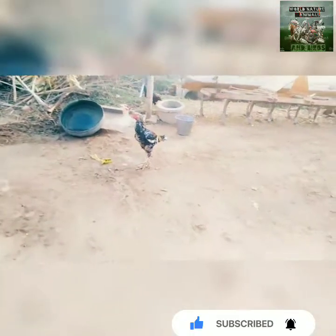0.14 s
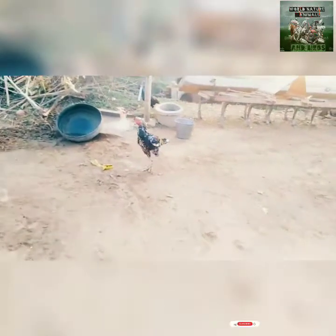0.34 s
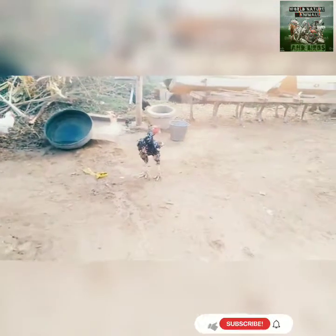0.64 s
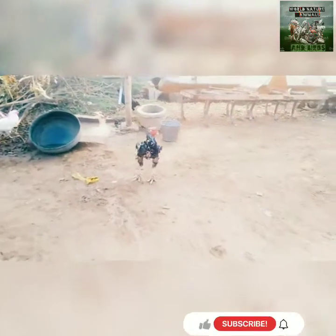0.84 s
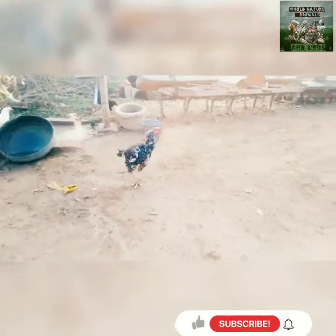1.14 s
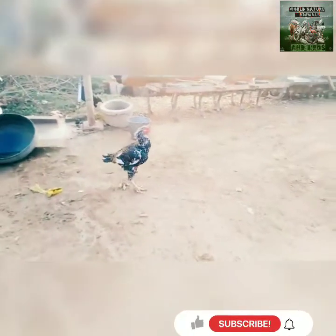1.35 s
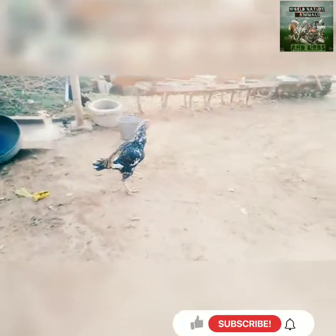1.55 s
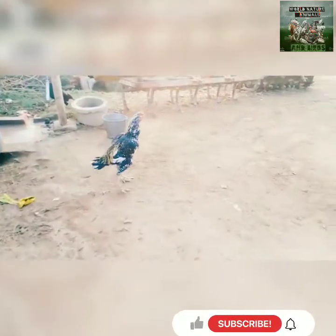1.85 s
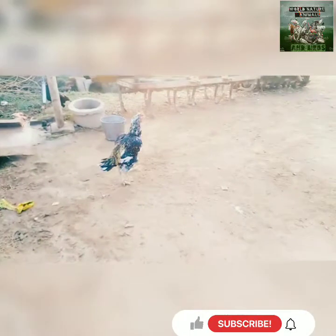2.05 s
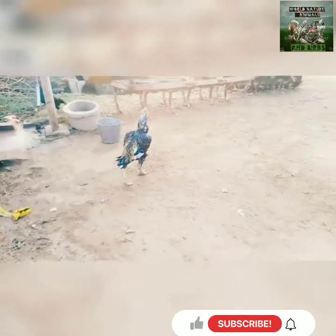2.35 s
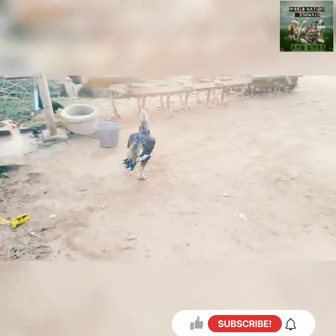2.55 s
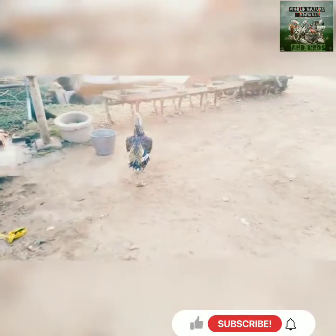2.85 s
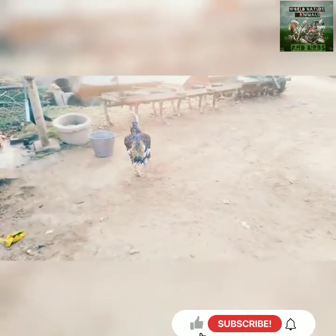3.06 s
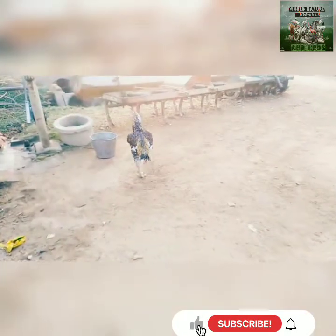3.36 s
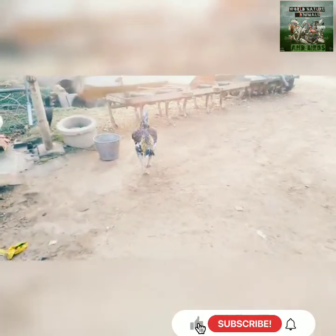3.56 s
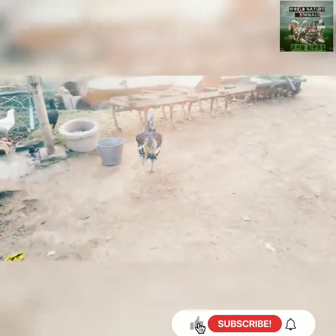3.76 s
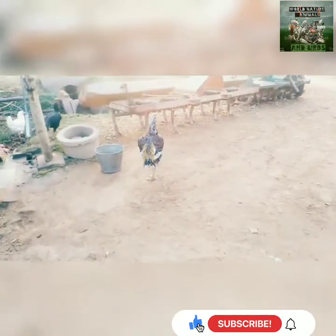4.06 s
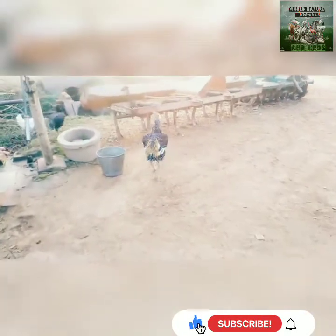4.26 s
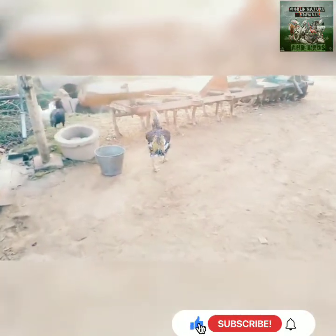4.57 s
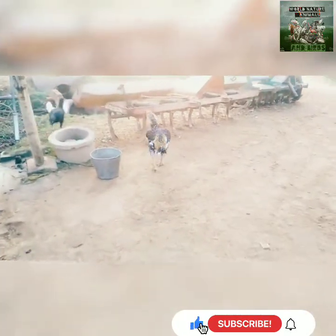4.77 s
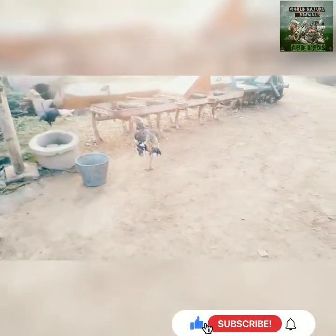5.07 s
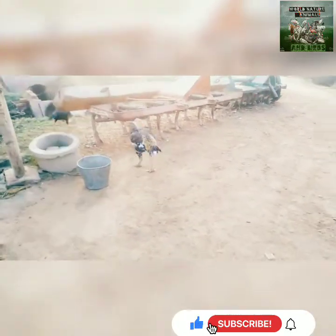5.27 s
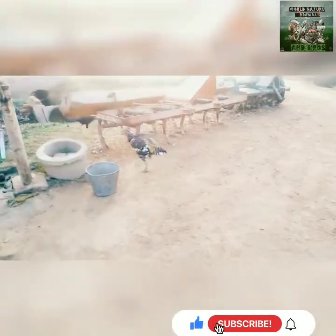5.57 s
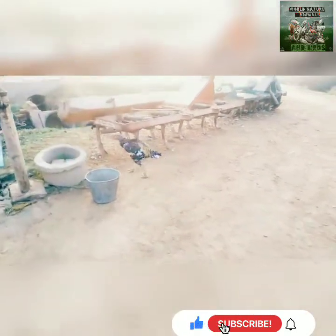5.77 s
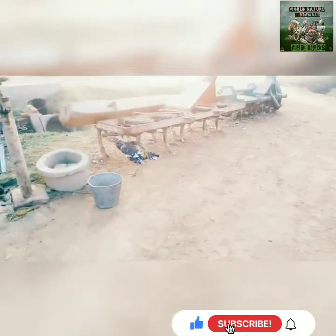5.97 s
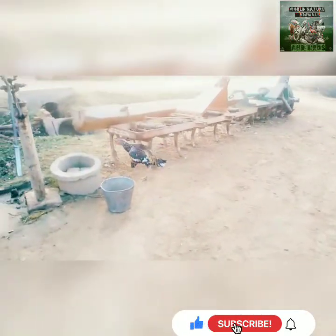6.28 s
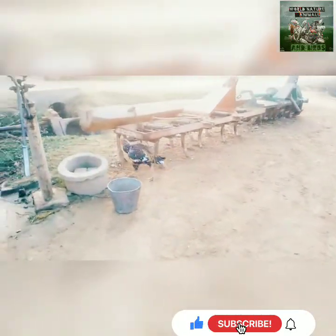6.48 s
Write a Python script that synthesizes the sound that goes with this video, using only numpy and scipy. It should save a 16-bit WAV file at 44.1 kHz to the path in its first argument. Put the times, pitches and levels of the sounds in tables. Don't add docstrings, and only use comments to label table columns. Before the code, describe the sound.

Long clear chicken call breaks into a squawk, followed by sparse clucks, light ticks and grit scuffs, with distant traffic rumbling underneath.

```python
import sys
import numpy as np
from scipy import signal
from scipy.fft import rfft, irfft
from scipy.io import wavfile
from scipy.ndimage import uniform_filter1d

SR = 44100
rng = np.random.default_rng(int(sys.argv[2]) if len(sys.argv) > 2 else 0)


def int16_out(signal):
    q = np.round(np.clip(np.atleast_2d(signal).T, -1, 1) * 32767)
    wavfile.write(sys.argv[1], SR, q.astype(np.int16))


def gain_from_db(level_db):
    decades = np.asarray(level_db, float) / 20
    return 10 ** decades


N = 292383


def rms_one(x):
    return x / np.sqrt(np.mean(x ** 2) + 1e-20)


def at_hz(points, hz):
    table_hz, table_db = np.transpose(points)
    return np.interp(np.log(hz), np.log(table_hz), table_db)


def wobble(size, rate_hz):
    r = np.exp(-2 * np.pi * rate_hz / SR)
    noise = rng.standard_normal(max(N // 8, size + 2000))
    slow = signal.lfilter([1], [1, -2 * r, r * r], noise)
    return rms_one(slow[2000:2000 + size])


def swell(rise_s, hold_s, fall_s):
    t = np.arange(int((rise_s + hold_s + 2 * fall_s) * SR)) / SR
    rising = np.sin(np.pi / 2 * np.clip(t / rise_s, 0, 1)) ** 2
    return rising * gain_from_db(-20 * np.clip(t - rise_s - hold_s, 0, None) / fall_s)


def add(track, s, sound):
    i = int(s * SR)
    track[i:i + len(sound)] += sound[:N - i]


def coloured(spectrum):
    hz = np.maximum(np.arange(N // 2 + 1) * SR / N, 1)
    return rms_one(irfft(rfft(rng.standard_normal(N)) * gain_from_db(at_hz(spectrum, hz)), N))


def band(x, low_hz, high_hz, order=3):
    edges_hz = [low_hz, min(high_hz, .45 * SR)]
    return signal.sosfilt(signal.butter(order, edges_hz, "band", fs=SR, output="sos"), x)


# (frequency [Hz], density [dB])
HISS = [(240, -25), (400, 0.5), (948, -7.5), (1550, -11.5), (1850, -11), (12400, -17), (14000, -18.5)]


def hiss():
    return gain_from_db(-89.5) * coloured(HISS)


# (frequency [Hz], density [dB])
RUMBLE = [(25, -34.5), (40, -20), (50, -9), (101, -1), (205, -6.5), (255, -16.5), (310, -30.5),
          (620, -77.5)]
RUMBLE_DB, GUST_DB = -60, 2
DRONE_HZ, DRONE_DB = 97.5, -71
LEAK_DB, LEAK_FROM_DB, LEAK_SPAN_DB = -62.5, -69.5, 21


def traffic(birds):
    coarse = wobble(N // 16 + 2, 16 * 19.0)
    gust = np.interp(np.arange(N) / 16, np.arange(len(coarse)), coarse)
    drone = rms_one(band(rng.standard_normal(N), DRONE_HZ - 6, DRONE_HZ + 6, order=2))
    heard_db = 10 * np.log10(uniform_filter1d(birds ** 2, size=2600) + 1e-12)
    opened = np.clip((heard_db - LEAK_FROM_DB) / LEAK_SPAN_DB, 0, 1)
    skirt = gain_from_db(LEAK_DB) * opened * rms_one(band(rng.standard_normal(N), 200, 270, order=2))
    rumble = gain_from_db(RUMBLE_DB) * coloured(RUMBLE)
    return gain_from_db(GUST_DB * gust) * (rumble + skirt) + gain_from_db(DRONE_DB) * drone


# (time [s], length [s], pitch [Hz], level [dB])
WHISTLES = [(0, 0.15, 558, -58), (0, 0.17, 1962, -69.5), (0, 0.098, 3100, -74.5), (0.061, 0.045, 1417, -73),
            (0.157, 0.04, 1302, -68), (0.377, 0.03, 1750, -75.5), (0.378, 0.16, 879, -72.5),
            (0.435, 0.13, 1496, -81.5), (0.659, 0.13, 1413, -86), (0.683, 0.093, 929, -82),
            (0.823, 0.06, 1880, -74), (0.971, 0.021, 3260, -66), (0.986, 0.18, 1520, -69),
            (1.417, 0.029, 1056, -79), (1.876, 0.046, 2620, -72), (1.922, 0.033, 1635, -77),
            (3.085, 0.016, 2750, -66), (4.607, 0.16, 2180, -73), (4.981, 0.18, 1370, -87),
            (5.8, .12, 530, -66), (4.18, .05, 650, -66), (6.35, .06, 540, -58), (6.35, .06, 1550, -70),
            (4.648, .025, 2190, -62), (4.35, .08, 970, -70), (6.1, .06, 600, -56), (4.385, .035, 1830, -78),
            (5.448, 0.073, 1306, -75), (6.141, 0.17, 1566, -68.5)]
# (time [s], length [s], first pitch
# [Hz], last pitch [Hz], level [dB])
CHIRPS = [(0.08, 0.027, 3520, 3340, -60), (0.093, 0.02, 6260, 6020, -69.5),
          (0.182, 0.12, 2690, 2630, -83.5), (1.522, 0.08, 2860, 3280, -75), (1.8, 0.43, 1066, 1220, -73),
          (2.09, 0.18, 1469, 1467, -80.5), (2.32, 0.049, 2850, 2770, -69),
          (2.345, 0.056, 2934, 2840, -57.5), (2.35, 0.067, 2680, 2600, -68.5), (2.36, .06, 2090, 2100, -76),
          (2.53, 0.043, 5740, 5680, -77.5), (2.58, .04, 5570, 5270, -81), (2.632, 0.049, 4970, 5040, -75),
          (2.705, 0.043, 5300, 5240, -76), (2.765, 0.035, 6100, 6200, -73),
          (3.48, 0.091, 2365, 2280, -78.5), (3.52, 0.2, 2184, 1987, -77), (3.492, 0.14, 477.5, 563, -66),
          (3.62, .06, 2330, 2310, -77), (3.71, 0.13, 2000, 2040, -85), (1.522, .025, 1350, 1450, -62),
          (1.6, .04, 2200, 2150, -76), (1.6, .13, 3250, 3300, -78), (4.845, 0.32, 1015, 830, -80),
          (5.62, 0.093, 3900, 3800, -87), (5.62, 0.098, 5370, 5500, -91), (5.86, .05, 1100, 1120, -70),
          (6.425, 0.029, 2740, 2650, -82)]
# (time [s], length [s], first pitch [Hz], last pitch
# [Hz], level [dB])
RASPS = [(0, 0.36, 289, 264.4, -61.5), (.014, 0.35, 428, 373, -71), (.07, 0.18, 3150, 3200, -77.5),
         (1.595, 0.096, 4310, 4260, -61.5), (1.61, 0.084, 2810, 2706, -73.5), (2.0, 0.053, 2790, 2760, -77),
         (2.034, 0.019, 461, 414, -52.5), (3.5, 0.28, 2300, 1900, -74), (5.8, 0.26, 320, 310, -70.5),
         (2.543, 0.033, 9020, 9040, -59.5), (6.055, .16, 5700, 4840, -67), (2.33, .09, 1800, 1900, -76),
         (5.815, .06, 1540, 1560, -70), (5.865, .12, 1620, 1600, -66), (5.57, .05, 1500, 1600, -70),
         (5.92, .08, 2200, 2150, -72), (6.1, .1, 2200, 2150, -72), (6.09, .08, 3200, 3300, -76),
         (6.523, 0.032, 3940, 3920, -81)]
# (time [s], length [s], pitch [Hz], level [dB], blur [Hz])
HELD = [
    (4.99, .56, 1760, -76.5, 24),
]
WHISTLE_SAG, CHIRP_BLUR, RASP_BLUR = 0.0084, 0.012, 0.073
WAVERS_PER_NOTE = 4


def blurred_tone(pitch_hz, shape, blur_hz, steady, spread):
    phase = 2 * np.pi * np.cumsum(pitch_hz) / SR
    paths = wobble(len(shape), blur_hz) + 1j * wobble(len(shape), blur_hz)
    return shape * np.real((steady + spread * paths) * np.exp(1j * phase))


def whistles():
    out = np.zeros(N)
    notes = []
    for s, length_s, hz, level_db in WHISTLES:
        notes.append((s, length_s, hz, hz * (1 - WHISTLE_SAG), level_db, WAVERS_PER_NOTE / length_s))
    for rows, blur in [(CHIRPS, CHIRP_BLUR), (RASPS, RASP_BLUR)]:
        notes += [(*row, blur * row[2]) for row in rows]
    for s, length_s, first_hz, last_hz, level_db, blur_hz in notes:
        shape = swell(0.11 * length_s, 0.39 * length_s, 0.57 * length_s)
        pitch_hz = np.linspace(first_hz, last_hz, len(shape))
        add(out, s, gain_from_db(level_db) * blurred_tone(pitch_hz, shape, blur_hz, 0.16, .5))
    for s, length_s, hz, level_db, blur_hz in HELD:
        shape = swell(.12, length_s, .06)
        pitch_hz = np.full(len(shape), float(hz))
        add(out, s, gain_from_db(level_db) * blurred_tone(pitch_hz, shape, blur_hz, .6, .45))
    return out


# (time [s], length [s], low edge [Hz], high edge [Hz], level [dB])
TICKS = [(.955, 0.0056, 640, 1930, -72.5), (1.252, 0.011, 320, 1000, -46), (1.253, 0.023, 1900, 13940, -62),
         (2.277, 0.034, 3200, 10100, -76), (3.447, 0.01, 3200, 9000, -79),
         (4.244, 0.029, 6980, 13500, -89.5), (4.648, 0.02, 2840, 5000, -62.5),
         (4.962, .012, 1550, 6900, -68), (5.222, 0.041, 3750, 6050, -76), (5.324, 0.016, 400, 3000, -54.5),
         (5.785, 0.0039, 2500, 14100, -70), (5.784, 0.012, 350, 700, -60), (5.785, .01, 750, 1250, -67),
         (6.07, 0.038, 4400, 14300, -65.5), (6.203, 0.03, 5400, 7840, -64.5)]
# (time [s], length [s], low edge [Hz], high edge [Hz], level [dB])
KICKS = [(3.308, 0.14, 4200, 7800, -64.5), (3.37, .13, 3900, 8400, -79), (3.31, 0.15, 10400, 13580, -75),
         (3.72, 0.15, 4850, 6100, -84.5), (3.769, 0.092, 3780, 12700, -85.5),
         (4.8, 0.12, 7400, 12600, -81.5), (5.87, 0.13, 2860, 7200, -68), (5.91, 0.049, 1910, 2500, -75)]
# (time [s], length [s], low edge [Hz], high edge [Hz], level [dB])
SCUFFS = [(.12, 0.31, 4300, 11000, -89.5), (1.08, 0.17, 4170, 13200, -83.5), (2.0, 0.45, 4930, 11890, -88),
          (3.05, 0.2, 5050, 8900, -89.5), (3.999, 0.15, 3340, 11800, -89.5),
          (4.945, 0.081, 2100, 7000, -69), (5.748, 0.16, 3170, 9100, -73), (5.84, 0.29, 495, 3400, -77),
          (6.52, 0.17, 3050, 9850, -87.5)]
TICK_RISE, KICK_RISE, SCUFF_RISE = 0.19, 0.12, 0.29
SNAP = 14


def scuffs():
    out = np.zeros(N)
    for rows, rise in [(TICKS, TICK_RISE), (KICKS, KICK_RISE), (SCUFFS, SCUFF_RISE)]:
        for s, length_s, low_hz, high_hz, level_db in rows:
            shape = swell(rise * length_s, 0, (1 - rise) * length_s)
            uneven_db = 3.2 * min(length_s / 0.039, 1) * wobble(len(shape), 66)
            grit = rng.standard_normal(len(shape)) * gain_from_db(uneven_db)
            if length_s < .02:
                grit[int(rise * length_s * SR)] += SNAP
            grit = signal.lfilter([1], [1, -.88], grit)
            add(out, s, gain_from_db(level_db) * shape * rms_one(band(grit, low_hz, high_hz)))
    return out


# (frequency [Hz], level [dB])
BEAK = [(1400, -16), (1650, -14.5), (2150, -3.5), (2500, -1), (2750, -21), (3050, -1), (3450, -25),
        (4200, -50)]
WIDEN_PER_DB = .5
ECHO_PER_DB, MEAN_CLUCK_DB = -0.35, -36
WASH_DB, WASH_TILT = 9, .7


def cluck(length_s, peak_db, first_hz, beak_db, goal_hz, pull, throat_hz, width_hz, rough, rise, hold, echo_db,
          lift=0, early=1, top_hz=1600, beak_scale=1):
    k = np.arange(1, 20)[:, None]
    shape = swell(rise * length_s, hold * length_s, max(1 - rise - hold, .05) * length_s)
    size = len(shape)
    slide = 1 - np.clip(1 - np.arange(size) / SR / length_s, 0, 1) ** early
    pitch = (first_hz + pull * (goal_hz - first_hz) * slide) * (1 + 0.075 * rough * wobble(size, 56))
    hz = k * pitch

    half_width_hz = width_hz * gain_from_db(WIDEN_PER_DB * (beak_db + 36.5)) / 2
    throat = 1 / (1 + ((hz - throat_hz * (1 + lift * slide)) / half_width_hz) ** 2)
    throat *= np.clip((top_hz - hz) / 300, 0, 1) * np.clip(hz / 480, 0, 1) ** 3.5
    beak = gain_from_db(beak_db + at_hz(BEAK, hz * beak_scale)) * (hz > 1000)

    own = rng.integers(0, N // 20, (2, *k.shape)) + np.arange(size)
    flutter = wobble(N // 10, 30 + 90 * rough)[own[0]]
    scatter = wobble(N // 10, 160)[own[1]]
    lines = np.sin(k * 2 * np.pi * np.cumsum(pitch) / SR + np.pi / 3 * k ** 2)
    throat_gain = throat * (1 + 1.8 * rough * flutter)
    beak_gain = beak * shape ** 0.26 * (0.73 + .6 * scatter)
    wave = np.sum((throat_gain + beak_gain) * lines, axis=0)
    scale = gain_from_db(peak_db) * shape / 2 / np.std(wave)

    sideways = np.sum((throat ** 1.3 + 1.3 * beak) * (0.25 + scatter) * lines, axis=0)
    wash = rms_one(signal.lfilter([1], [1, -WASH_TILT], rng.standard_normal(N // 8)))[:size]
    sideways = sideways + gain_from_db(WASH_DB + min(beak_db, -15)) * np.std(wave) * wash
    send_db = echo_db + ECHO_PER_DB * (peak_db - MEAN_CLUCK_DB)
    return scale * wave, gain_from_db(send_db) * scale * sideways


# (time [s], length [s], peak [dB],
# pitch [Hz], beak opening [dB])
NEAR_HEN = [(1.490, 0.031, -38.5, 245.2, -25), (2.508, 0.036, -42, 292, -36),
            (2.519, 0.051, -26.5, 362.2, -27), (2.741, 0.022, -47, 252, -45),
            (2.759, .036, -27.5, 321, -26.5)]
SHRILL_HEN = [(5.912, 0.014, -42, 225, -15), (6.238, .03, -47, 220, -26), (6.200, 0.031, -24.5, 212, -17)]
FAR_HEN = [(3.264, 0.048, -59.5, 267.3, -29), (3.958, 0.052, -58.5, 329, -30),
           (6.338, 0.062, -56, 259.8, -22), (6.516, 0.024, -65, 307, -61)]
CROONING_HEN = [(3.446, 0.2, -63.5, 436, -26), (3.787, 0.056, -59.5, 408, -38)]
BRIGHT_HEN = [(5.218, 0.021, -32.5, 252, -7.5)]
PIPING_HEN = [(6.06, 0.03, -34.5, 550, -8)]
ROUGH_HEN = [(5.505, .23, -61, 510, -29)]
MUFFLED_HEN = [(4.231, 0.025, -39, 272, -67), (4.644, 0.031, -36, 263.7, -25)]
MUTTERING_HEN = [(5.926, .016, -46, 370, -30), (5.938, .014, -46, 345, -30), (6.047, .02, -56, 480, -5),
                 (6.085, .016, -41, 400, -30)]
LILTING_HEN = [(4.156, .05, -60, 425, -40), (4.286, .05, -54, 465, -46), (4.47, .044, -53, 460, -36)]
HUMMING_HEN = [(4.252, .04, -63, 440, -46), (4.443, .03, -59, 425, -46)]
# goal pitch [Hz], pull towards it [0-1], early [exponent], throat centre and width [Hz],
# throat lift [share], throat top [Hz], beak scale [ratio], rough [0-1], rise and hold [share of length], echo [dB]
HENS = [(NEAR_HEN, dict(goal_hz=206.1, pull=0.65, throat_hz=641, lift=0.11, width_hz=210, rough=0.16, rise=0.1, hold=0.37, echo_db=-19)),
        (SHRILL_HEN, dict(goal_hz=224, pull=0.9, early=2.5, throat_hz=915, width_hz=125, beak_scale=.97, rough=0.1, rise=0.6, hold=0.1, echo_db=-18.5)),
        (MUTTERING_HEN, dict(goal_hz=450, pull=0.1, throat_hz=900, width_hz=500, rough=0.3, rise=0.4, hold=0.2, echo_db=-18)),
        (LILTING_HEN, dict(goal_hz=530, pull=0.8, throat_hz=980, width_hz=200, rough=0.1, rise=0.3, hold=0.6, echo_db=-20)),
        (HUMMING_HEN, dict(goal_hz=430, pull=0.3, throat_hz=880, width_hz=200, rough=0.15, rise=0.3, hold=0.5, echo_db=-22)),
        (BRIGHT_HEN, dict(goal_hz=296.6, pull=0.89, early=1.04, throat_hz=950, width_hz=1400, top_hz=1420, beak_scale=1.12, rough=0.17, rise=0.71, hold=0.26, echo_db=-20)),
        (PIPING_HEN, dict(goal_hz=570, pull=0.6, early=1.13, throat_hz=850, width_hz=1300, beak_scale=1, rough=0.25, rise=0.65, hold=0.15, echo_db=-20)),
        (FAR_HEN, dict(goal_hz=304, pull=0.13, throat_hz=704, width_hz=360, rough=0.29, rise=0.28, hold=0.37, echo_db=-20.5)),
        (CROONING_HEN, dict(goal_hz=530, pull=0.94, early=2, throat_hz=890, width_hz=222, rough=0.33, rise=0.43, hold=0.7, echo_db=-24.5)),
        (ROUGH_HEN, dict(goal_hz=690, pull=.9, throat_hz=1200, width_hz=1100, rough=.5, rise=.35, hold=.3, echo_db=-25)),
        (MUFFLED_HEN, dict(goal_hz=314.5, pull=0.73, throat_hz=660, width_hz=290, rough=0.14, rise=0.31, hold=0.32, echo_db=-18.5))]


def clucks():
    dry, send = np.zeros((2, N))
    for rows, voice in HENS:
        for s, *row in rows:
            direct, sideways = cluck(*row, **voice)
            add(dry, s, direct)
            add(send, s, sideways)
    return band(dry, 87, 3500, order=5), band(send, 390, 3450, order=6)


# (time [s], pitch [Hz], level [dB])
CALL = [
    [(1.518, 681, -58.5), (1.532, 679, -45), (1.544, 757, -47), (1.566, 745, -41.5), (1.592, 652, -40.5),
     (1.608, 672, -36.5), (1.654, 644, -36.5), (1.668, 598, -43.5)],
    [(1.666, 637, -47), (1.676, 618, -42), (1.71, 676, -36.5), (1.744, 698, -38.5), (1.792, 716, -35),
     (1.852, 675, -35), (1.88, 683, -38.5), (1.91, 681, -36), (1.929, 698, -44)],
    [(1.923, 700, -44), (1.949, 662, -36.5), (2.009, 666, -37), (2.109, 692.4, -41), (2.161, 656, -41.5),
     (2.219, 667, -50), (2.241, 632, -50), (2.255, 627, -79.5)],
    [(2.262, 680, -67), (2.268, 685, -46), (2.286, 577, -44.5), (2.302, 619.6, -49), (2.34, 662, -47),
     (2.363, 682, -36.5), (2.385, 690, -35.5), (2.404, 701, -39), (2.43, 720, -81)],
]
# (time [s], width [s], depth [dB])
FALTERS = [(1.588, 0.0022, -11.5), (1.699, 0.0038, -5.5), (2.302, .004, -14), (2.322, .003, -6),
           (2.333, .003, -5), (2.352, 0.0018, -15), (2.357, 0.0018, -12.5), (2.368, 0.0022, -10),
           (2.375, 0.0029, -4), (2.394, .003, -1)]
# (time [s], octave [dB], third partial [dB])
OVERTONES = [(1.53, -39, -54.5), (1.599, -26.5, -58), (1.69, -27, -63), (1.73, -39.5, -47),
             (1.78, -46.5, -67.5), (1.83, -51, -60.5), (1.941, -32.5, -43), (2.049, -40.5, -52),
             (2.12, -50.5, -68), (2.292, -32.5, -55)]
SQUAWK_S, BETWEEN_LINES_DB = 2.3, -16
BREATH_DB, BREATH_PER_DB, FULL_DB, MOST_BREATH_DB, SQUAWK_BREATH_DB = -57.5, 1.16, -34.5, 16.5, 24.5


def long_call():
    out = np.zeros(N)
    breath = rms_one(band(rng.standard_normal(N), 500, 1250, order=6))
    for rows in CALL:
        s, *columns = np.transpose(rows)
        t = np.arange(s[0], s[-1], 1 / SR)
        size = len(t)
        pitch, level_db = [np.interp(t, s, c) for c in columns]
        squawk = np.clip((t - SQUAWK_S) / 0.0027, 0, 1)
        falter_db = sum(depth_db * np.exp(-((t - at) / width_s) ** 2) for at, width_s, depth_db in FALTERS)
        at, *overtones = np.transpose(OVERTONES)
        octave_db, third_db = [np.interp(t, at, c) for c in overtones]
        leak_db = np.minimum(BREATH_PER_DB * (FULL_DB - level_db - falter_db), MOST_BREATH_DB)
        breath_db = BREATH_DB + leak_db + SQUAWK_BREATH_DB * squawk

        jitter = (0.007 + 0.04 * squawk) * wobble(size, 60)
        phase = 2 * np.pi * np.cumsum(pitch * (1 + jitter)) / SR
        tone = np.sin(phase)
        tone += gain_from_db(octave_db + 4.0 * wobble(size, 40)) * np.sin(2 * phase + .5 * wobble(size, 70))
        tone += gain_from_db(third_db + 6.0 * wobble(size, 20)) * np.sin(3 * phase + .3 * wobble(size, 70))
        tone += gain_from_db(third_db - 18 + 8.0 * wobble(size, 9)) * np.sin(4 * phase)
        between_lines = np.sin(phase * .6) + .5 * np.sin(phase * 3 / 2)
        tone += squawk * gain_from_db(BETWEEN_LINES_DB + 5.0 * wobble(size, 50)) * between_lines
        tone *= 1 + (0.018 + 0.16 * squawk) * wobble(size, 80)
        tone += gain_from_db(breath_db) * breath[int(s[0] * SR):][:size]
        edge = np.clip(np.minimum(t - s[0], s[-1] - t) / 0.0056, 0, 1)
        add(out, s[0], np.sqrt(2) * gain_from_db(level_db + falter_db) * edge * tone)
    return out


def call_to_walls(call):
    squawking = np.arange(N) > SQUAWK_S * SR
    scatter = rms_one(band(rng.standard_normal(N), 86, 430, order=2))
    return gain_from_db(-39.0 + 8 * squawking) * call * (1 + 0.72 * squawking * scatter)


def yard(x):
    t60_s, gap_s, cut_hz = 0.35, 0.0053, 11000
    t = np.arange(SR // 2) / SR
    tail = rng.standard_normal(len(t)) * gain_from_db(-60 * t / t60_s) * np.clip(t / gap_s - 1, 0, 1)
    tail = signal.lfilter(*signal.butter(1, cut_hz, fs=SR), tail)
    return signal.fftconvolve(x, tail / np.sqrt(np.sum(tail ** 2)))[:N]


def noise_reduction(x, patchy_db):
    cells = signal.stft(x, nperseg=512)[2]
    chance = rng.standard_normal((cells.shape[0] // 3 + 1, cells.shape[1]))
    chance = rms_one(uniform_filter1d(chance, size=9, axis=1))
    chance = np.repeat(chance, 3, axis=0)[:cells.shape[0]]
    gain = gain_from_db(patchy_db * np.minimum(chance, 1.2))
    return signal.istft(cells * gain, nperseg=512)[1][:N]


def scene():
    far, feet, call = whistles(), scuffs(), long_call()
    near, near_send = clucks()
    echoes = yard(near_send + call_to_walls(call) + gain_from_db(-14) * feet + gain_from_db(-16.5) * far)
    faint = noise_reduction(feet, patchy_db=9.5) + noise_reduction(echoes, patchy_db=4.5)
    rumble = traffic(gain_from_db(-23.5) * call + near + far + faint)
    return (call + near + far + faint + rumble + hiss())[None]


def low_pass(x):
    return signal.sosfilt(signal.butter(12, 14470, fs=SR, output="sos"), x)


def record(dry):
    return low_pass(dry)


dry = scene()
out = record(dry)
int16_out(out)
```